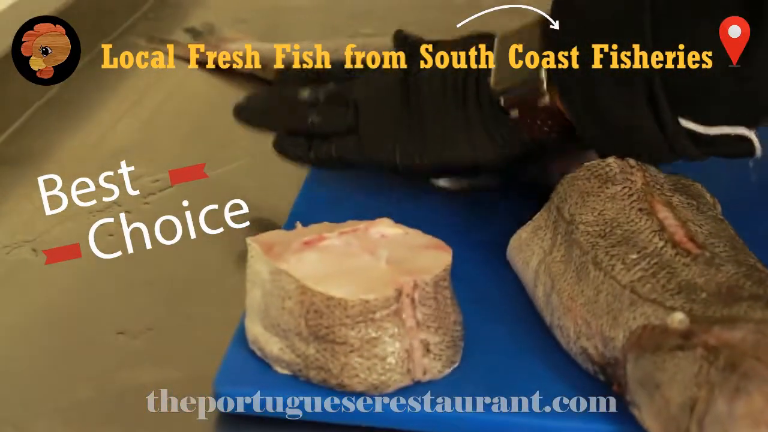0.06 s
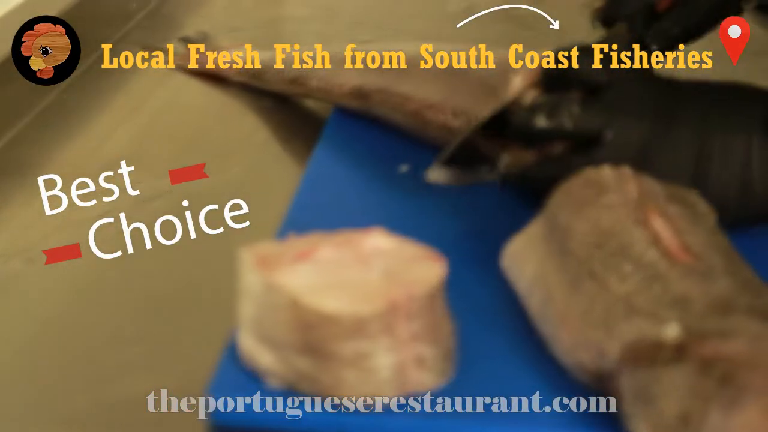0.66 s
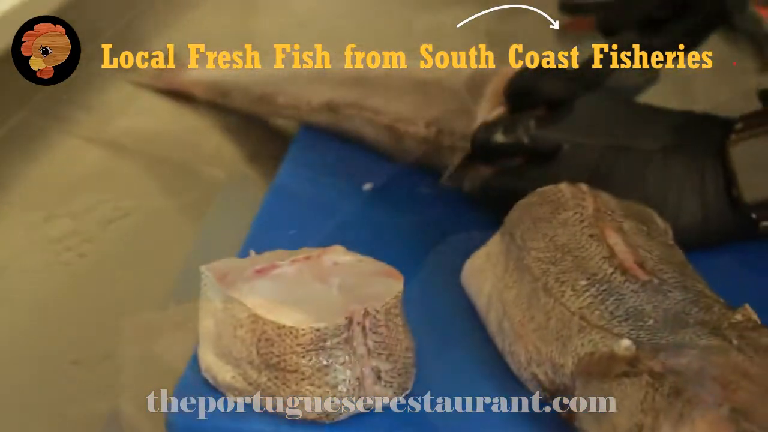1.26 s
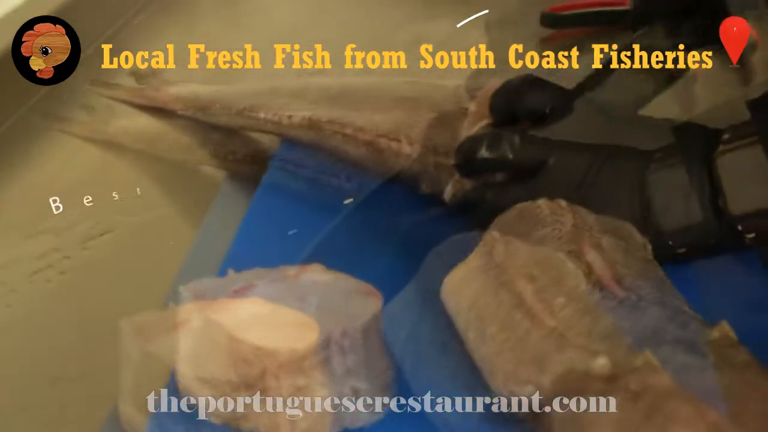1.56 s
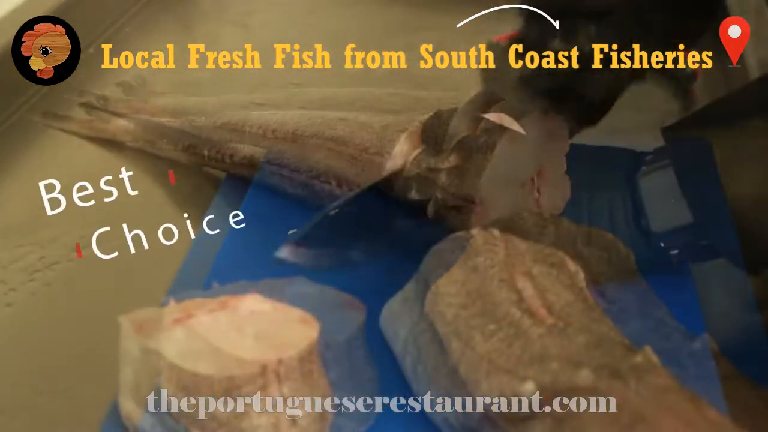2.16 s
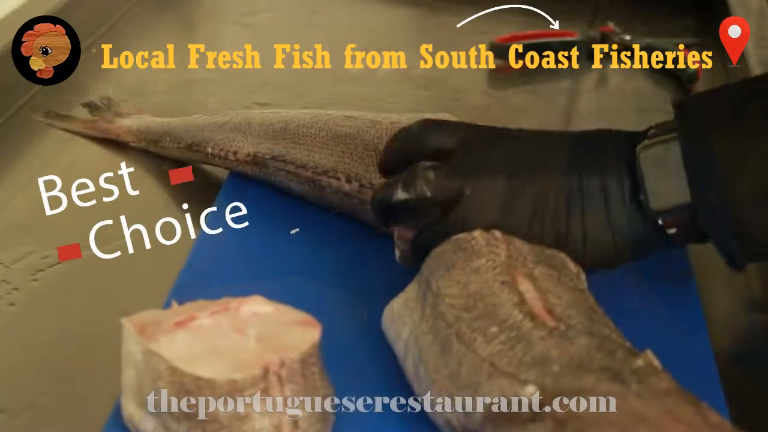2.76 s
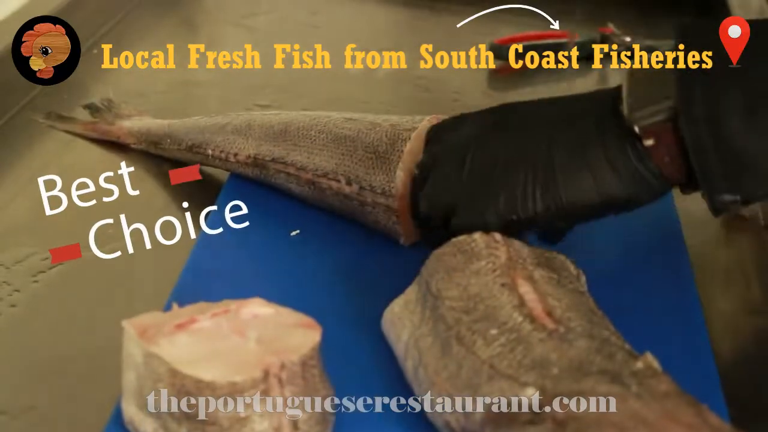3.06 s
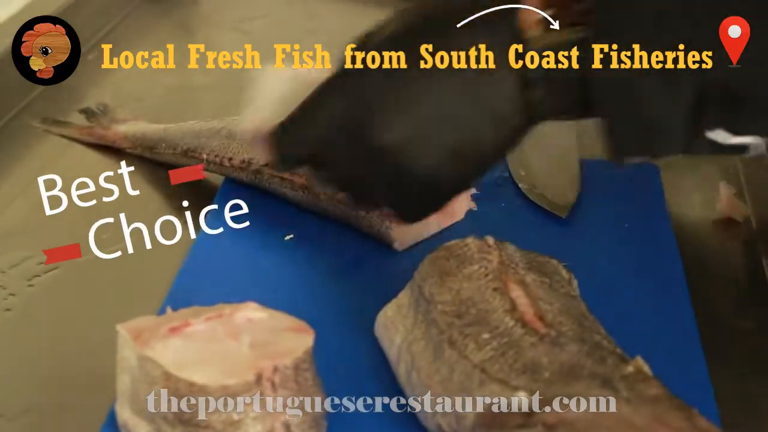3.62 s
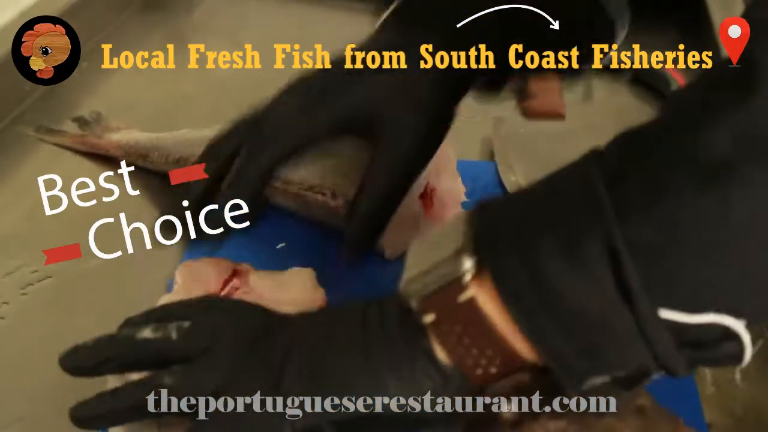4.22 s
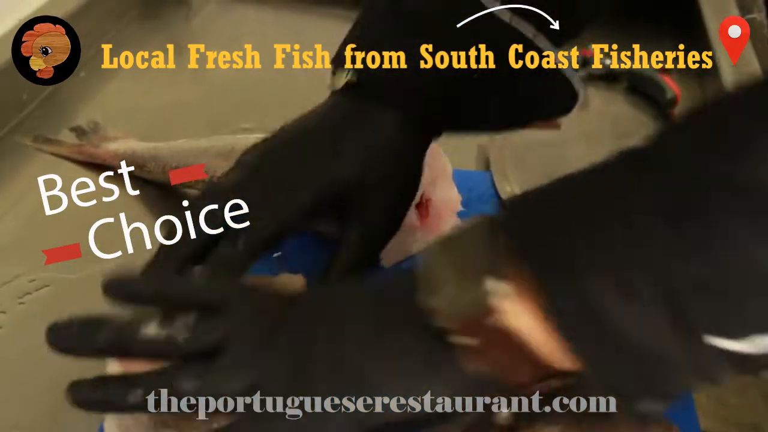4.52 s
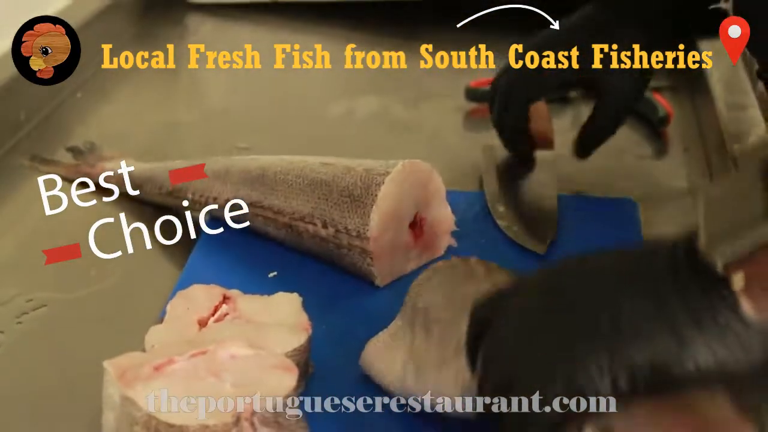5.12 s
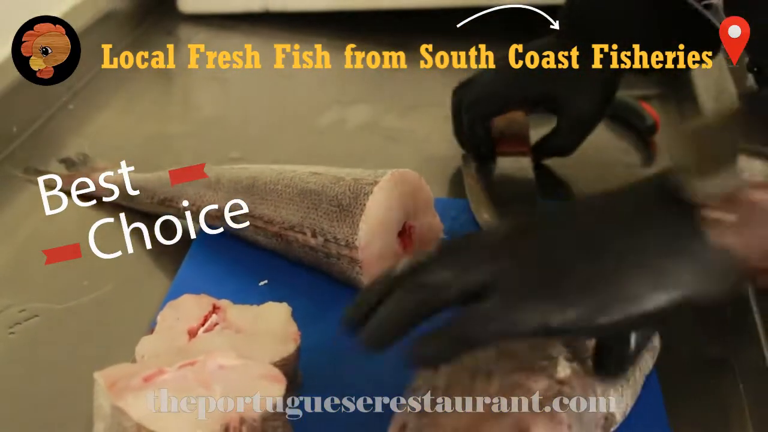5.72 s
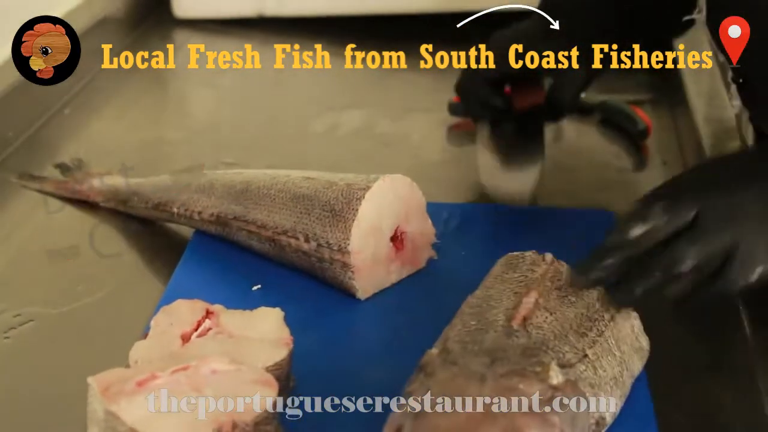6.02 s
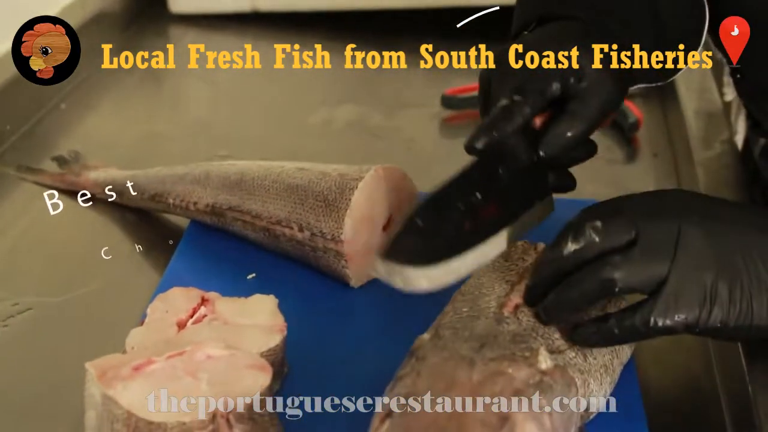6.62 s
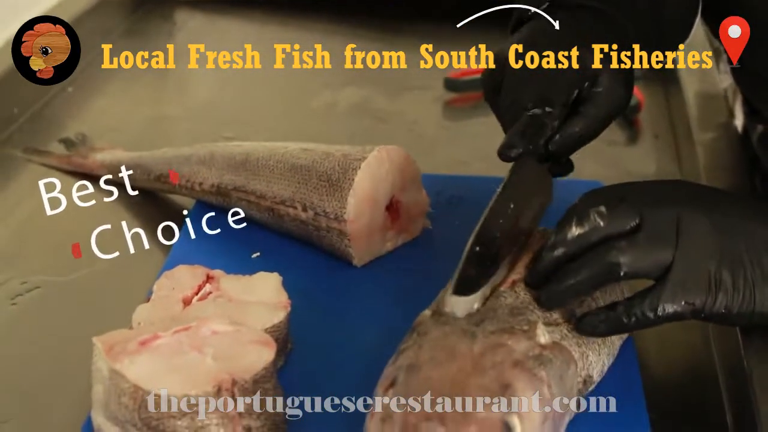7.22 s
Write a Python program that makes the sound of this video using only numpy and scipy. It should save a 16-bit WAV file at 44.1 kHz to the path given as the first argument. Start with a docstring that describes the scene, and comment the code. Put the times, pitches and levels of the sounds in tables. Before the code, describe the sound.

A heavy knife works through a large fish on a plastic board. A dull thud gives way to wet rustling, small bone snaps and a brief squelch. Sharp chops follow, bunched together, making the steel counter boom and rattle. After a lull, pieces are shifted with soft bumps, then more knocks and blade clinks. The sounds are close and lean to the right, in a small, hard kitchen with refrigerator hum and ventilation hiss.

```python
"""A heavy knife chops through the backbone of a large fish on a plastic board that lies on a steel counter.
Bone cracks, the blade slams onto the board, and the counter booms and rattles. Then pieces of fish and the
knife are shifted about: wet flesh rustles, pops and squelches under blade and gloves.
Behind it, a refrigerator hums and the ventilation hisses in the small, hard kitchen."""
import sys
import numpy as np
from scipy import signal
from scipy.fft import rfft, irfft, next_fast_len
from scipy.io import wavfile

SR = 44100
rng = np.random.default_rng(int(sys.argv[2]) if len(sys.argv) > 2 else 0)


def pcm_store(signal):
    """Save signal as 16-bit PCM."""
    levels = np.round(np.clip(np.atleast_2d(signal), -1, 1) * 32767)
    wavfile.write(sys.argv[1], SR, levels.astype(np.int16).T)


N = 325451
TIME = np.arange(N) / SR
FFT_SIZE = next_fast_len(N, real=True)
BIN_HZ = np.arange(FFT_SIZE // 2 + 1) * SR / FFT_SIZE

# Knife and fish hit the board. Each row: start in seconds, decay in seconds, counter thud in dB,
# board knock in dB, knock pitch in Hz, crack in dB, crack pitch in Hz, crack low-pass in Hz, bite lead in
# seconds, settling delay in seconds, settling strength from 0 to 1. A lead or delay of 0 skips that part.
BLOWS = [ (0.002, 0.016, -46, -42, 597, -47.5, 1950, 5330, 0.0017, 0, 0),
         (0.027, 0.014, -38.5, -38, 800, -38, 1880, 6900, 0, 0.036, 0.54),
         (1.384, 0.03, -45, -33.5, 826, -46, 1980, 9000, 0.0082, 0, 0),
         (1.960, 0.023, -45, -41, 708, -57, 1800, 8000, 0, 0, 0),
         (2.812, 0.0097, -39, -22.5, 716, -37, 1922, 9998, 0.00029, 0.026, .24),
         (2.9578, 0.028, -66, -49, 720, -42, 1950, 3220, 0, 0, 0),
         (3.328, 0.0057, -55, -29, 680, -32, 1900, 4700, 0.00022, 0, 0),
         (3.359, 0.016, -40.5, -40, 653, -49, 1800, 4000, 0, 0, 0),
         (3.486, 0.0039, -29.5, -19, 870, -16.5, 3200, 11400, 0.0099, 0.016, 0.34),
         (3.555, 0.031, -31, -24, 860, -27.5, 1950, 9700, 0.0033, 0.029, .85),
         (3.617, 0.044, -39, -28.5, 510, -33.5, 1380, 8700, 0.0091, 0, 0),
         (3.831, 0.009, -43, -40.5, 700, -38, 2820, 14100, 0.0094, 0, 0),
         (4.827, 0.0025, -59, -54, 1030, -48.5, 3281, 5178, 0, 0, 0.01),
         (4.916, 0.032, -47.5, -40, 650, -43.5, 1460, 2641, 0.0012, 0, 0),
         (5.147, 0.0063, -55, -45, 640, -69, 1800, 9020, 0.0013, 0, 0),
         (5.169, 0.0028, -54, -50.5, 603, -70, 2000, 8000, 0, 0, 0),
         (5.228, 0.016, -51, -50.5, 684, -58, 1400, 6000, 0.0045, 0, 0),
         (5.602, 0.013, -43.5, -37, 614, -47, 2973, 8946, 0.00068, 0, 0),
         (5.6487, 0.0096, -37.5, -20.5, 713, -28.5, 2200, 10000, 0.011, 0, 0),
         (5.662, 0.01, -36.5, -42, 800, -37, 1900, 9000, 0.0003, 0, 0),
         (5.699, 0.018, -48, -35.5, 720, -39, 1400, 5000, 0, 0, 0),
         (5.7297, 0.0027, -43, -43, 905, -31, 3900, 7060, 0.00021, 0, 0),
         (5.734, 0.0034, -36.5, -29, 756, -29.5, 3120, 6860, 0.0015, 0, 0),
         (5.884, 0.01, -47.5, -60, 1240, -39, 2900, 5400, 0, 0, 0)]
# The board's woody modes. Each row: multiple of the knock pitch, relative level in dB, T60 in seconds.
BOARD_MODES = [(0.87, -2.5, 0.05), (1, 4, 0.054), (1.18, -7, 0.049), (1.6, -6.5, 0.033)]
# Small bones and sticky skin snap. Each row: start in seconds, level in dB, pitch in Hz, decay in seconds.
SNAPS = [(0.205, -45, 7500, 0.0053), (0.688, -46, 9000, .004), (0.736, -43, 7500, 0.0047),
         (1.103, -33, 3300, 0.0068), (1.163, -42, 4000, 0.0054), (1.21, -41, 3280, 0.0067),
         (1.295, -24, 3900, 0.014), (1.3375, -25.5, 3007, 0.0087), (1.552, -51, 5970, 0.0054),
         (2.118, -52, 6000, 0.006), (2.134, -34, 2200, 0.0036), (2.156, -51, 10600, .012),
         (2.205, -39, 2600, .003), (2.43, -47, 9000, .005), (2.813, -32, 2400, 0.009),
         (2.958, -39, 2200, 0.016), (2.976, -47, 10000, 0.0072), (3.0799, -50, 10120, 0.0044),
         (3.556, -27, 4500, 0.0022), (3.837, -43, 10990, .007), (4.524, -49.5, 5000, 0.013),
         (4.973, -39.5, 6460, 0.0046), (5.586, -25, 5750, 0.0061), (5.62, -36.5, 5500, 0.012),
         (6.094, -46, 5890, 0.013)]
# The fish's weight booms in the hollow counter, at a pitch set by where it presses.
# Each row: start in seconds, peak level in dB, pitch in Hz.
BOOMS = [(0.004, -32, 129.5), (2.823, -34.5, 149.4), (3.597, -23.5, 197.6), (4.914, -42, 148.1),
         (5.16, -42, 180), (5.243, -50, 203), (5.646, -28, 151.7), (5.742, -38, 184)]
# Modes of counter and knife. Each row: pitch in Hz, relative level in dB, T60 in seconds.
COUNTER_MODES = [(142, 4, 0.15), (194.5, -1, 0.24), (294.4, 5.5, 0.33), (452, -15, 0.4), (514, 2.5, 0.19),
                 (737, -6, 0.12), (862, -13, 0.27), (1142, 1, 0.26), (1355, -12, 0.47), (1690, 3.5, 0.058),
                 (1860, 9, 0.043), (2353, 8, 0.056), (3460, -13, .04)]
KNIFE_MODES = [(722, -0.5, 0.05), (1120, -12.5, 0.045), (1410, -23, 0.051), (1950, -13, 0.045),
               (2441, -7.5, 0.039), (3470, -15, 0.045), (3670, 1, 0.018), (4340, -23, 0.043),
               (5500, -29, 0.05), (7400, -27, 0.07), (8870, -29, 0.065)]
# The knife is struck or lifted. Each row: start in seconds, level in dB.
CLINKS = [(3.328, -22), (5.734, -24), (5.888, -21.5)]
# Blade and gloves slide on flesh. Each row: start and length in seconds, rub and wet-layer gains in dB.
STROKES = [(0.03, .11, -44.5, -51), (0.152, 0.39, -51, -55.5), (0.51, 0.54, -59, -57.5),
           (1.035, 0.5, -48, -53), (1.542, 0.12, -59, -57.5), (2.102, 0.17, -37, -57),
           (2.398, 0.27, -38, -53), (4.662, 0.14, -54.5, -62), (5.965, 0.51, -57.5, -57.5),
           (7.097, 0.13, -56, -74)]
# Resonances of the opening cut.
# Each row: narrow and open pitch in Hz, level in dB, attack and release in seconds.
CUT_RESONANCES = [(930, 630, -36, 0.0085, 0.014), (519, 400, -35.5, 0.039, 0.025),
                  (379, 262, -38, 0.072, 0.076)]
# Steel squeaks in wet flesh. Each row: start and hold in seconds, pitch in Hz, level in dB.
SQUEAKS = [(3.068, 0.023, 4450, -60), (3.125, 0.14, 4725, -68)]
# Glides over the board, and soft low swells. Each row: start and length in seconds, level in dB.
SWISHES = [(4.15, 0.091, -54), (4.973, 0.3, -56.5), (5.063, 0.071, -59)]
LOW_SWELLS = [(6.52, 0.15, -54), (7.146, 0.14, -46)]
# The refrigerator's tones. Each row: pitch in Hz, level in dB, waver in dB.
HUM_TONES = [(101.5, -55.5, 1.5), (163.4, -70.5, 4), (275, -68, 4.5), (300, -65, 2), (450, -69, 1),
             (656, -71, 2.5), (868, -69, 2.5)]
# EQ curves of the noise layers. Each row: frequency in Hz, relative level in dB.
RUB_EQ = [(120, -8), (400, -0.5), (800, 5), (1200, 1), (1700, 3), (2400, -4.5), (3000, -3), (4100, -8),
          (5800, -8.5), (9000, -22.5), (15000, -38)]
CRACKLE_EQ = [(2000, -25), (4000, 11), (7000, -5), (10000, 4), (15500, -16)]
SWISH_EQ = [(1500, -1), (3500, 1.5), (6000, 0.5), (10000, -3), (15500, -12)]
AIR_EQ = [(25, -27), (45, -14), (70, -11.5), (100, -4), (135, -11), (200, -13), (300, -12), (450, -12),
          (850, -18), (1700, -20.5), (3100, -26), (5800, -32), (8000, -34), (15500, -42.5)]
# The kitchen's reverb time. Each row: frequency in Hz, T60 in seconds.
ROOM_T60 = [(120, 0.51), (400, 0.31), (1200, 0.2), (4000, 0.33), (12000, 0.25)]
# Its reverb level. Each row: frequency in Hz, level in dB against the dry sound.
ROOM_LEVEL = [(120, -3.5), (350, -1.5), (800, -5.5), (2000, -7), (5000, -10), (9000, -9.5), (13000, -11)]
# Stereo image of reverb and ventilation. Each row: frequency in Hz, left-right correlation from 0 to 1.
ROOM_CORRELATION = [(60, 1), (200, 0.98), (700, 0.91), (2000, 0.062), (6000, 1), (12000, 0.89)]
AIR_CORRELATION = [(60, 0.53), (300, 0.23), (2000, 0.0085), (7000, 0.95), (14000, 1)]
# Panning of near sounds and ventilation. Each row: frequency in Hz, left minus right in dB.
NEAR_BALANCE = [(100, -14.5), (550, -15), (1400, -12.5), (2600, -6), (5500, -5.5), (14000, -4)]
AIR_BALANCE = [(80, -13), (250, -10.5), (1300, -7.5), (4400, -4.5), (9000, -0.5)]
# Phase between the microphones. Each row: frequency in Hz, lead of the left side in radians.
LEFT_LEAD = [(150, 0.1), (2000, 0.94), (5500, 1), (8000, 0.27)]


def contacts(hit_rise_s=0.0011, bite_swell=0.78, bite_pitch=1.03, bite_top_hz=7500,
             settle_decay_s=0.036, settle_knock_hz=546, settle_crack_hz=1800, settle_top_hz=6100):
    """Split each blow into its hit and, where it has them, a bite before and a settling after."""
    rows = []
    for blow in BLOWS:
        start, decay_s, thud_db, knock_db, knock_hz, crack_db, crack_hz, top_hz = blow[:8]
        bite_s, settle_s, strength = blow[8:]
        rows.append((start, hit_rise_s, decay_s, thud_db, knock_db, knock_hz, crack_db, crack_hz, top_hz))
        if bite_s > 0:   # the edge bites into bone: softer, a touch higher, muffled by flesh
            rows.append((start - bite_s, bite_swell * bite_s, bite_s, thud_db - 9.5,
                         knock_db - 13.5, knock_hz * bite_pitch,
                         crack_db - 6, crack_hz * bite_pitch, min(top_hz, bite_top_hz)))
        if settle_s > 0 and strength > 0:   # flesh settles, dull and slow; its weight lowers the knock
            settle_db = knock_db + 20 * np.log10(strength)
            rows.append((start + settle_s, hit_rise_s, settle_decay_s, settle_db - 7.5,
                         settle_db, settle_knock_hz, settle_db - 12.5, settle_crack_hz, settle_top_hz))
    return rows


def blows(thud_hz=182, grit_db=8.0, clatter_db=-2.5, board_ring_db=-5):
    """Each contact is a dying burst of tiny touches and fractures: counter thud, board knock, crack."""
    out, t = np.zeros(N), np.arange(SR // 4) / SR
    head = SR // 50   # the first 20 ms set the level
    for start, rise_s, decay_s, thud_db, knock_db, knock_hz, crack_db, crack_hz, top_hz in contacts():
        thud_noise, knock_noise, crack_noise, grit = rng.standard_normal((4, len(t)))
        attack = 1 - np.exp(-t / rise_s)
        force = attack * np.exp(-t / decay_s)
        thud = band_around(thud_noise, thud_hz, 1.85) * np.exp(-t / (decay_s * 1.36))
        thud = band_around(thud, thud_hz, 2)
        knock = band_around(knock_noise * force, knock_hz, 1.494)
        crack = band_around(crack_noise * from_db(grit_db * grit) * force, crack_hz, 1.44, order=1)
        crack = low_pass(band(crack, crack_hz / 10, SR / 2), top_hz)   # flesh cushions the sharpest edge
        energy = head * np.sum(force ** 2) / np.sum(force[:head] ** 2)   # longer contacts carry more
        for layer, db in ((thud, thud_db), (knock, knock_db + clatter_db), (crack, crack_db)):
            add(out, start, from_db(db) * layer * np.sqrt(energy / np.sum(layer ** 2)))
        note = attack * sum(mode(t, ratio * knock_hz, db, t60) for ratio, db, t60 in BOARD_MODES)
        add(out, start, from_db(knock_db + board_ring_db) * note * np.sqrt(head / np.sum(note ** 2)))
    return out


def snaps(rise_s=0.0026, low_cut_hz=1700, bone_hz=2500, bone_db=3):
    """Short, bright fractures with no bass, coloured by the ring of a thin bone."""
    out, t = np.zeros(N), np.arange(SR // 10) / SR
    for start, db, hz, decay_s in SNAPS:
        fracture = band_around(rng.standard_normal(len(t)), hz, 1.43, order=1)
        fracture = band(fracture, low_cut_hz, SR / 2)
        bone = from_db(bone_db) * band_around(fracture, bone_hz, 1.08, order=1)
        shape = (1 - np.exp(-t / rise_s)) * np.exp(-t / decay_s)
        add(out, start, from_db(db) * rms_one(fracture + bone) * shape)
    return out


def counter_booms(rise_s=0.013, t60=0.11):
    """Soft, heavy pushes each swell into one low mode of the counter top."""
    out, t = np.zeros(N), np.arange(SR // 2) / SR
    swell = (1 - np.exp(-t / rise_s)) ** 2 * from_db(-60 * t / t60)
    for start, db, hz in BOOMS:
        add(out, start, from_db(db) * swell / swell.max() * np.sin(2 * np.pi * hz * t))
    return out


def counter_rattle(gain_db=-7, layer_hz=(200, 600, 1100), pivot_db=-22, expansion=1.37, low_cut_hz=90):
    """Board and steel top ring on: thuds drive the low modes, knocks the middle, cracks the high ones."""
    starts, _, _, thud_db, knock_db, _, crack_db, _, _ = np.transpose(contacts())
    onsets = (np.maximum(starts, 0) * SR).astype(int)
    spectra = [list(zip(layer_hz, levels)) for levels in zip(thud_db, knock_db, crack_db)]
    out = np.zeros(N)
    for hz, db, t60 in COUNTER_MODES:
        drive_db = np.array([at_hz(spectrum, hz) for spectrum in spectra])
        drive_db = pivot_db + expansion * (drive_db - pivot_db)   # the fish damps light touches
        clicks = np.zeros(N)
        clicks[onsets] = from_db(gain_db + db + drive_db)
        out += ring(clicks, hz, t60)
    return band(out, low_cut_hz, SR / 2)


def knife_clinks(contact_s=0.00078):
    """The steel's modes swell during a brief touch, then ring out, damped by the hand."""
    out, t = np.zeros(N), np.arange(SR // 2) / SR
    steel = sum(mode(t, hz, db, t60) for hz, db, t60 in KNIFE_MODES)
    for start, db in CLINKS:
        add(out, start, from_db(db) * steel * (1 - np.exp(-t / contact_s)) ** 2)
    return out


def hand_pressure(attack_share=0.18, release_share=0.35, uneven_db=2.5):
    """Strokes swell, hold and fade under an uneven hand; gives the gains of the rub and wet layers."""
    rub, wet = np.zeros((2, N))
    for start, length, rub_db, wet_db in STROKES:
        progress = (TIME - start) / length
        shape = np.clip(np.minimum(progress / attack_share, (1 - progress) / release_share), 0, 1)
        rub += from_db(rub_db) * shape
        wet += from_db(wet_db) * shape
    return rub * from_db(uneven_db * drift(40)), wet * from_db(uneven_db * drift(90))


def flesh_rustle(rub_db=-5.5, crackle_db=-9, grain_db=3.5, slips_per_s=260, slip_s=0.0042, patchy_db=1.6):
    """Fibres catch and let go in uneven slips under the stroke while the wet film crackles."""
    rub_gain, wet_gain = hand_pressure()
    slips = (rng.random(N) < slips_per_s / SR) * rng.uniform(0.4, 1, N)
    friction = 1 + signal.lfilter([1], [1, -np.exp(-1 / (slip_s * SR))], slips + 1e-18)
    rub_noise, wet_noise, grain = rng.standard_normal((3, N))
    fibres = friction * rub_noise
    # as the contact travels, one resonance of blade and flesh after another stands out
    edges = np.geomspace(120, 15000, 15)
    patches = [band(fibres, low, high) * from_db(patchy_db * drift(70))
               for low, high in zip(edges, edges[1:])]
    rubbing = coloured(sum(patches), RUB_EQ)
    crackle = coloured(friction * wet_noise * from_db(grain_db * grain), CRACKLE_EQ)
    return from_db(rub_db) * rub_gain * rubbing + from_db(crackle_db) * wet_gain * crackle


def sticky_pops(per_s=280, gain_db=-7, size_db=3.5, ring_cycles=22):
    """Sticky film parts in tiny pitched pops while a stroke lasts."""
    _, wet_gain = hand_pressure()
    clicks = (rng.random(N) < per_s / SR) * from_db(size_db * np.minimum(rng.exponential(1, N), 3))
    pitches = np.geomspace(2200, 12000, 16)
    pitch_index = rng.integers(0, len(pitches), N)
    pops = sum(ring(clicks * (pitch_index == k), hz, ring_cycles / hz) for k, hz in enumerate(pitches))
    return from_db(gain_db) * wet_gain * rms_one(pops)


def squelch(start_s=1.379, hold_s=0.053, opening_s=0.03645, width_hz=60):
    """The cut sucks in air; its resonances sink as the hollow grows, and the lowest lingers longest."""
    narrowness = np.exp(-np.maximum(TIME - start_s, 0) / opening_s)
    out = np.zeros(N)
    for narrow_hz, open_hz, db, attack_s, release_s in CUT_RESONANCES:
        suction = pitched_noise(open_hz + (narrow_hz - open_hz) * narrowness, width_hz)
        out += from_db(db) * envelope(start_s, attack_s, hold_s, release_s) * suction
    return out


def blade_squeaks(attack_s=0.0076, release_s=0.014, width_hz=60):
    """The blade sings thinly as it is drawn through the flesh."""
    return sum(from_db(db) * envelope(start, attack_s, hold_s, release_s) * pitched_noise(hz, width_hz)
               for start, hold_s, hz, db in SQUEAKS)


def wet_swishes(grain_db=5.0):
    """A film of water shears under gliding skin and gloves: a fine hiss that swells and fades."""
    gain = np.zeros(N)
    hiss, grain = rng.standard_normal((2, N))
    for start, length, db in SWISHES:
        add(gain, start, from_db(db) * np.sqrt(np.hanning(int(length * SR))))
    return gain * coloured(hiss * from_db(grain_db * grain), SWISH_EQ)


def low_swells(low_hz=25, high_hz=70):
    """A soft sub-bass rumble fades in and out."""
    gain = np.zeros(N)
    for start, length, db in LOW_SWELLS:
        add(gain, start, from_db(db) * np.hanning(int(length * SR)))
    return gain * rms_one(band(rng.standard_normal(N), low_hz, high_hz))


def refrigerator(wander_rad_per_db=0.058):
    """Mains hum and compressor tones waver a little in level and phase."""
    out = np.zeros(N)
    for hz, db, waver_db in HUM_TONES:
        gain = np.sqrt(2) * from_db(db + waver_db * drift(6.1))
        out += gain * np.sin(2 * np.pi * hz * TIME + wander_rad_per_db * waver_db * drift(8.7))
    return out


def ventilation(air_db=-50.5, whine_db=-71, whine_hz=3070, whine_width_hz=150):
    """A steady stereo bed of moving air with a thin whine in it."""
    air = coloured(diffuse_noise(FFT_SIZE, AIR_CORRELATION), AIR_EQ)
    return from_db(air_db) * air + from_db(whine_db) * pitched_noise(whine_hz, whine_width_hz)


def kitchen_reverb(x, predelay_s=0.0047, build_s=0.0034):
    """Dense reflections build up and die away band by band."""
    t = np.arange(SR * 3 // 4) / SR
    edges = np.geomspace(70, 16000, 15)
    noises = [diffuse_noise(len(t), ROOM_CORRELATION) for _ in range(2)]   # neighbouring bands alternate
    build = 1 - np.exp(-np.maximum(t - predelay_s, 0) / build_s)
    response = 0
    for k, (low, high) in enumerate(zip(edges, edges[1:])):
        hz = np.sqrt(low * high)
        fade = build * from_db(-60 * t / at_hz(ROOM_T60, hz))
        tail = rms_one(band(noises[k % 2], low, high) * fade)
        unity_gain = np.sqrt(2 * (high - low) / SR / len(t))
        response += from_db(at_hz(ROOM_LEVEL, hz)) * unity_gain * tail
    return signal.fftconvolve(x[None], response, axes=1)[:, :N]


def microphones(pair, balance):
    """The left side hears a little earlier, is weak in the bass and catches up in the treble."""
    left_gain = 2 / (1 + from_db(-at_hz(balance, BIN_HZ)))
    response = np.array([left_gain * np.exp(1j * at_hz(LEFT_LEAD, BIN_HZ)), 2 - left_gain])
    return irfft(rfft(pair, FFT_SIZE) * response, FFT_SIZE)[:, :N]


def from_db(db):
    return 10 ** (np.asarray(db) / 20)


def rms_one(x):
    return x / np.sqrt(np.mean(x ** 2) + 1e-20)


def at_hz(curve, hz):
    """Read a curve on a log-frequency axis."""
    frequencies, values = np.transpose(curve)
    return np.interp(np.log(hz + 1e-6), np.log(frequencies), values)


def band(x, low_hz, high_hz, order=2):
    sos = signal.butter(order, [low_hz, min(high_hz, SR / 2 - 1000)], "band", fs=SR, output="sos")
    return signal.sosfilt(sos, x + 1e-18)


def band_around(x, hz, ratio, order=2):
    return band(x, hz / ratio, hz * ratio, order)


def low_pass(x, hz, order=4):
    return signal.sosfilt(signal.butter(order, min(hz, SR / 2 - 1000), fs=SR, output="sos"), x + 1e-18)


def coloured(x, eq):
    """Shape a steady sound with an EQ curve; rms 1."""
    return rms_one(irfft(rfft(x, FFT_SIZE) * from_db(at_hz(eq, BIN_HZ)), FFT_SIZE)[..., :N])


def drift(rate_hz):
    """Random modulation that ramps between values of spread 1."""
    knots = rng.standard_normal(4000)
    return np.interp(TIME * rate_hz, np.arange(len(knots)), knots)


def mode(t, hz, db, t60):
    """A sine that dies by 60 dB in t60 seconds."""
    return from_db(db - 60 * t / t60) * np.sin(2 * np.pi * hz * t)


def ring(x, hz, t60):
    """A resonator: a unit click sets a sine of height 1 ringing."""
    radius, angle = from_db(-60 / (t60 * SR)), 2 * np.pi * hz / SR
    return signal.lfilter([0, np.sin(angle)], [1, -2 * radius * np.cos(angle), radius ** 2], x + 1e-18)


def pitched_noise(hz, width_hz):
    """A noise-fed resonance whose pitch may move; rms 1."""
    flutter = low_pass(rng.standard_normal((2, N)), width_hz, order=2)
    phase = 2 * np.pi * np.cumsum(hz * np.ones(N)) / SR
    return rms_one(flutter[0] * np.cos(phase) + flutter[1] * np.sin(phase))


def diffuse_noise(size, correlation):
    """White stereo noise as it arrives from all sides."""
    mid, side = rfft(rng.standard_normal((2, size)))
    alike = np.clip(at_hz(correlation, np.arange(len(mid)) * SR / size), 0, .99)
    return irfft(np.sqrt((1 + alike) / 2) * mid + np.sqrt((1 - alike) / 2) * side * [[1], [-1]], size)


def envelope(start_s, attack_s, hold_s, release_s):
    """A linear attack, and a release that begins hold_s after the start."""
    age = TIME - start_s
    return np.clip(age / attack_s, 0, 1) * np.exp(-np.clip((age - hold_s) / release_s, 0, 20))


def add(track, start_s, sound):
    start = max(round(start_s * SR), 0)
    track[start:start + len(sound)] += sound[:N - start]


def scene():
    """Mix the work at the board and its reverb over the steady machines."""
    cutting = squelch() + blade_squeaks() + flesh_rustle() + wet_swishes() + snaps() + sticky_pops()
    work = blows() + counter_booms() + counter_rattle() + knife_clinks() + cutting
    near = work + kitchen_reverb(work) + low_swells() + refrigerator()
    return microphones(near, NEAR_BALANCE) + microphones(ventilation(), AIR_BALANCE)


def record(dry):
    """Soft-clip the loudest peaks and cut the very top."""
    ceiling, cutoff_hz = 0.8, 15900
    rounded = dry / (1 + (dry / ceiling) ** 6) ** (1 / 6)
    return signal.sosfilt(signal.ellip(10, .1, 80, cutoff_hz, fs=SR, output="sos"), rounded)


dry = scene()
out = record(dry)
pcm_store(out)
```